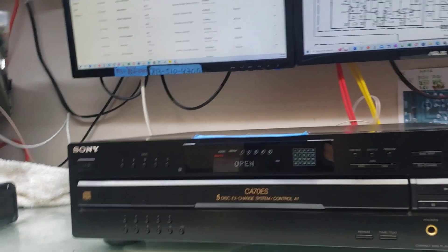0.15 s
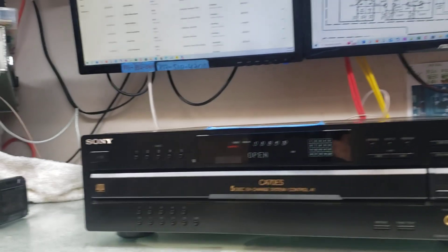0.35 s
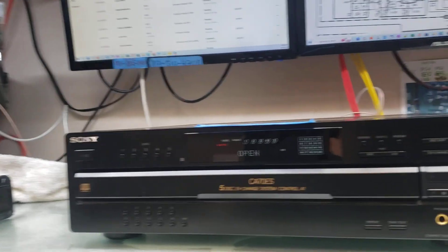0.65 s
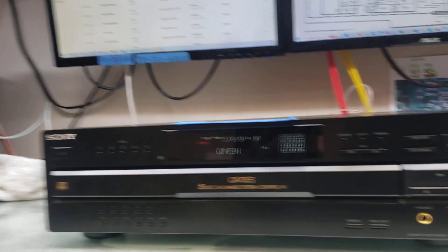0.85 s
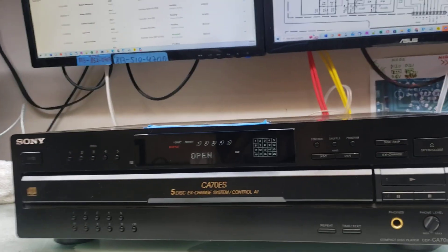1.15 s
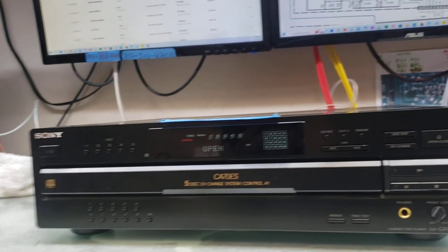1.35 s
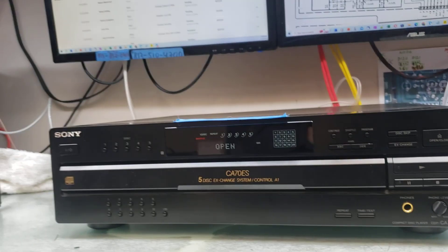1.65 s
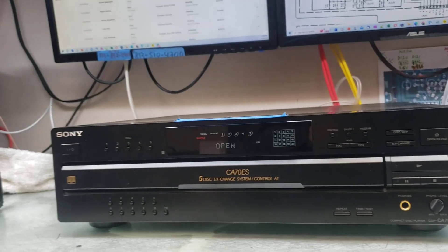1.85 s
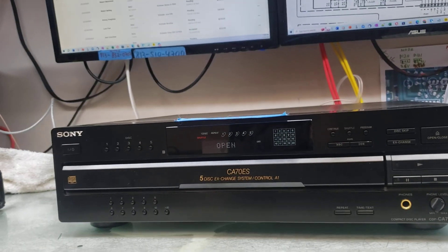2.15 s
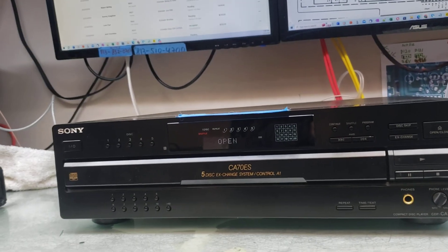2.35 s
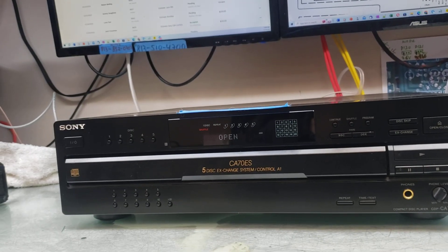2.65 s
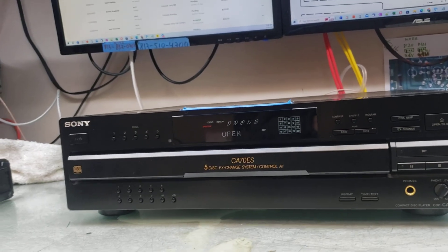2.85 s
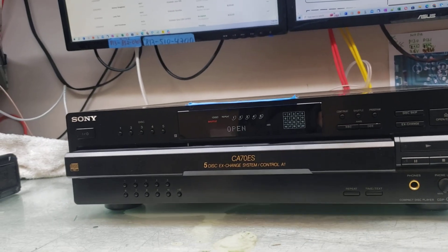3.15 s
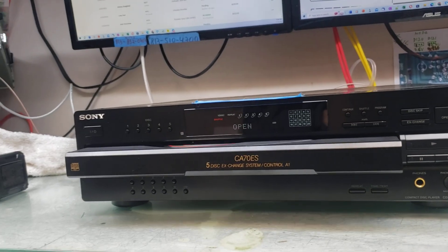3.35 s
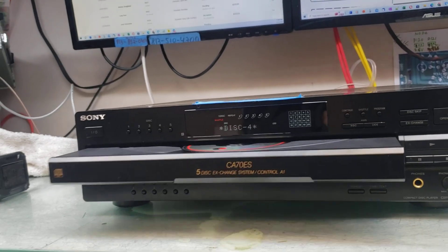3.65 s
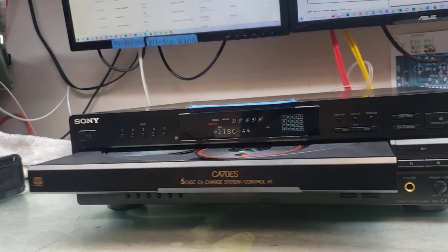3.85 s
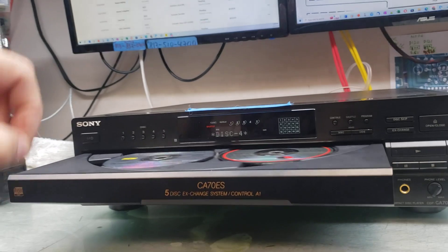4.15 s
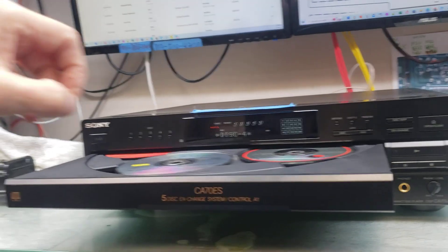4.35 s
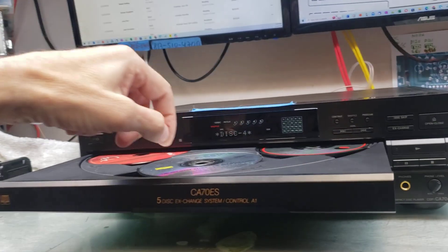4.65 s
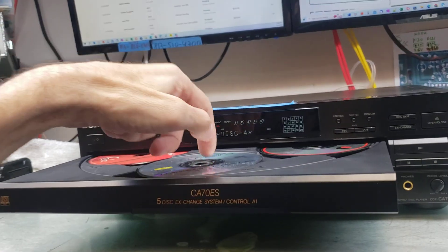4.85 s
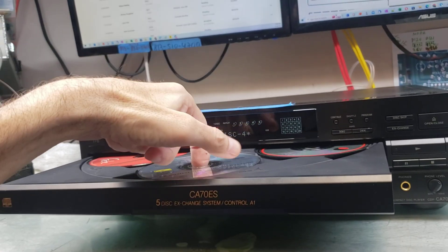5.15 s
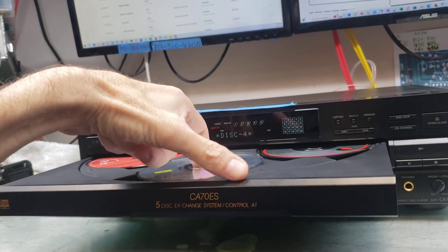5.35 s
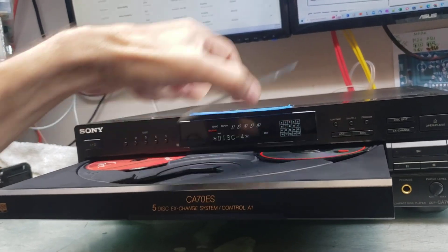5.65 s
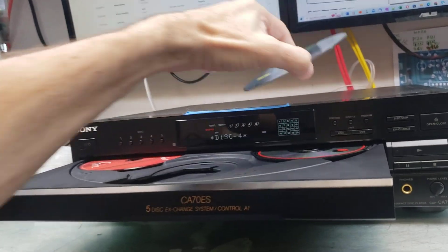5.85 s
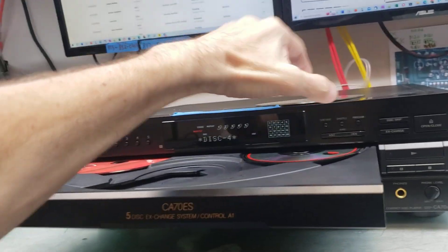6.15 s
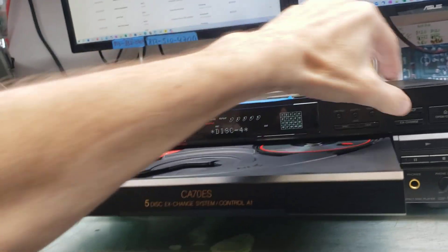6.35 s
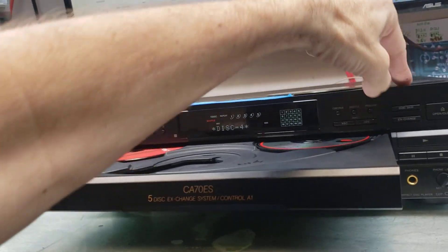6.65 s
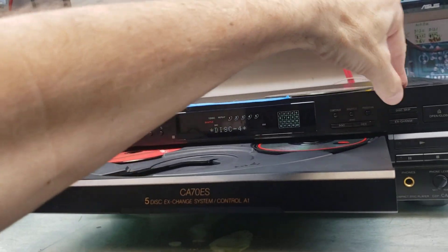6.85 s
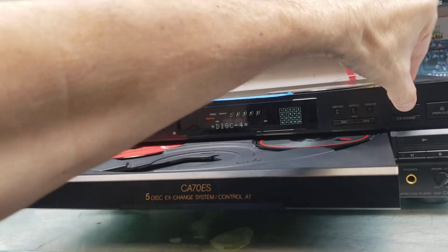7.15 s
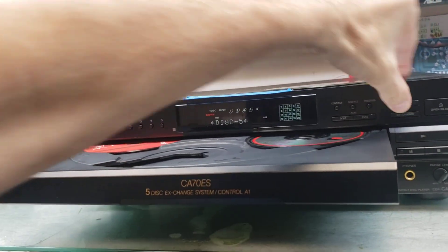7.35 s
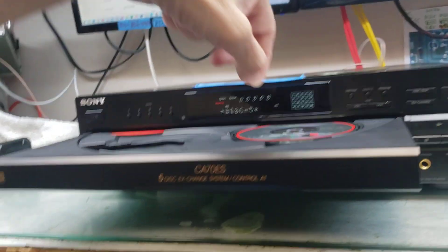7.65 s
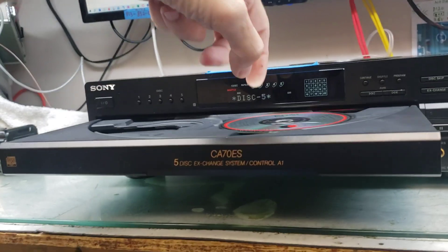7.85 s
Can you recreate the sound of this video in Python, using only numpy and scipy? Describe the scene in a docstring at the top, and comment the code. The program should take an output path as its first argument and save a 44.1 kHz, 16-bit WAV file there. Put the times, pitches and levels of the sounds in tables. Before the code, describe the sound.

A large key on a carousel disc changer thumps and clacks right at the start, close to a hand-held microphone. From about 0.8 seconds the motor grinds with a faint whine, and irregular knocks ring in the steel case, clustering around 1.5 and 2.8 seconds. From about 2.6 seconds the plastic tray slides out with a fine, high hiss; the motor gains a hum, then stops at 4.5 seconds. Light ticks follow at 5 seconds, and a disc is lifted with a sharp scrape and clicks around 5.4 seconds. It is laid on the lid with a short clatter at 6 seconds. A button snaps at 7.2 seconds and the platter turns with a soft whir and hiss until the end at 8 seconds, with a few low bumps through bench and microphone. Workshop fans drone quietly throughout.

```python
"""A key thumps and clacks on a carousel disc changer, close to a hand-held camera with two microphone
ports. The loader knocks and the motor grinds, both exciting the modes of the steel case, and the tray
hisses out by friction on its rails. A hand lifts a disc and lays it on the lid with scrapes and ticks;
a button snaps and the platter turns briefly. Low jolts pass through bench and camera, and fans drone
in the workshop throughout."""
import sys
import numpy as np
from scipy import signal
from scipy.fft import rfft, irfft
from scipy.io import wavfile
from scipy.ndimage import uniform_filter1d

SR = 44100
rng = np.random.default_rng(int(sys.argv[2]) if len(sys.argv) > 2 else 0)


def store_pcm(level_fs):
    """Save levels as 16-bit WAV."""
    pcm = np.round(np.clip(level_fs, -1, 1) * 32767).astype(np.int16)
    wavfile.write(sys.argv[1], SR, np.atleast_2d(pcm).T)


N = 352800

# Modes of the steel case in five groups, from low to high: pitch_hz, width_hz, level_db
CASE_LOW = [(90, 16, -6.5), (199, 21.6, -3), (290.8, 27, 3), (406, 103, -3)]
CASE_HOLLOW = [(499.4, 41, -3.5), (606, 50, -2.5), (772, 170, -4.5)]
CASE_MID = [(840, 48, -2.1), (963, 110, 1.8), (1082, 78, 0.5)]
CASE_UPPER = [(1226, 203, 0.5), (1517, 130, -1.5), (1655, 112, -1.5), (1950, 174, -3), (2086, 320, -4.5)]
CASE_HIGH = [(2570, 460, 12.5), (3450, 720, -24), (3870, 1800, 8), (6050, 340, 8), (6660, 890, 8)]


def motor():
    """Forced vibration: uneven gear teeth shake the case; commutator, belt and platter gear add tones."""
    # Loader, tray and platter runs, a table each: time_s, grind_db, whine_db
    run_levels = [
        [(0.78, -79, -88), (0.85, -54.5, -70), (0.99, -60, -65), (1.25, -69.5, -65.5), (1.53, -66, -72),
         (1.68, -56.5, -68), (1.9, -63.5, -68), (2.06, -66, -68.5), (2.16, -58.5, -69), (2.35, -74, -72.5),
         (2.55, -62, -69), (2.8, -55, -66), (3.02, -50.5, -74), (3.31, -62, -62.5), (3.36, -65, -56)],
        [(3.38, -58.5, -61), (3.42, -55, -60.5), (3.71, -53.5, -61), (4.1, -53, -69), (4.35, -55, -59),
         (4.49, -53.5, -66), (4.54, -62.5, -86)],
        [(7.3, -63, -90), (7.37, -62.5, -90), (7.56, -71, -95), (8.0, -73.5, -94)],
    ]
    # What each run adds: low_modes_above_grind_db, hum_above_grind_db, platter_whine_db
    run_tones = [(1.5, -13, -82), (-5, -4.5, -80), (6, 1.5, -77.5)]
    # Drone of the loaded motor: time_s, pitch_hz
    hum_curve = [(3.35, 403.8), (3.614, 411.7), (4.5, 411.7)]
    # A dry gear rubbing: start_s, length_s, level_db
    rasps = [(0.84, 0.066, -73), (3.665, 0.082, -64.5), (3.776, 0.12, -68.5), (3.95, 0.5, -73)]
    teeth_per_s, whine_hz, platter_hz = 1500, 1490, 1930
    flutter_db, flutter_per_s, fade_s = 3, 14, 0.02
    tooth_size = gain_of(2.8 * np.minimum(rng.exponential(1, N), 5))
    impacts = tooth_size * (rng.random(N) < teeth_per_s / SR)
    lumps = gain_of(1.3 * drift(25))
    teeth = unit_rms(port_noise() * (2 + unit_rms(uniform_filter1d(impacts, 30)))) * lumps
    shell = gain_of(-8) * ring(teeth, CASE_HOLLOW) + gain_of(-4) * ring(teeth, CASE_MID)
    shell += gain_of(-2.5) * ring(teeth, CASE_UPPER)
    runs = [[(*row, *tones) for row in run] for run, tones in zip(run_levels, run_tones)]
    low_flutter, whine_flutter, platter_flutter, hum_flutter = (
        gain_of(flutter_db * drift(flutter_per_s)) for _ in range(4))
    grind = envelope(runs, [1], fade_s) * shell
    grind += low_flutter * envelope(runs, [1, 3], fade_s) * ring(teeth, CASE_LOW[1:3])
    rasp = contacts(rasps, [2], t60_s=0.25, rise_s=0.006, held=True) * ring(teeth, CASE_HIGH)
    whine = np.sqrt(whine_flutter) * envelope(runs, [2], fade_s) * waver(whine_hz, 110, 0.21, 0.3)
    whine += platter_flutter * envelope(runs, [5], 0.004) * waver(platter_hz, 90, 0.38, 0.24)
    hum_hz = np.interp(np.arange(N) / SR, *np.transpose(hum_curve))
    hum = hum_flutter * envelope(runs, [1, 4], fade_s) * waver(hum_hz, 59, 0.75, 0.73)
    return grind + rasp + whine + hum


def loader_knocks():
    """Impact excitation: where a knock lands sets how strongly each group of case modes rings."""
    # Knocks: start_s, mid_db, then relative to mid_db: low_db, hollow_db, upper_db, high_db
    knocks = [(0.494, -72, 24, 4, -9, -12), (0.808, -48, -15, -15, -7, -28), (0.821, -45, -16, -7, -8, -29),
              (1.012, -44, -3, 4, -21, -29), (1.124, -57.5, 7.5, 9, -2, -20),
              (1.492, -41.5, -8, -16, -13, -21), (1.508, -42, -9, 0.5, 0.5, -13),
              (1.591, -48.5, -7, 1, -18, -23), (1.666, -48, -14, -2.5, -14, -18),
              (1.691, -45.5, -7, -4, -5, -11), (1.711, -48.5, -9, 1, -10, -10.5),
              (1.773, -47.5, -20, -1.5, -6, -15.5), (2.089, -62, 0, 10.5, 4, -12),
              (2.154, -48, -7, 2, -4, -22), (2.496, -54.5, 5.5, 5.5, -5, -29),
              (2.546, -39, -23, -20, -11, -28), (2.754, -62.5, -2, 12, 11, -3),
              (2.791, -38, -4, -8, -5.5, -15.5), (2.807, -49, -20, -22, -18, -16),
              (2.857, -55.5, 9, 0, 6, -6), (2.889, -39.5, 0.5, -3.5, -3.5, -22),
              (2.948, -44.5, 0, -11, -14, -23), (2.965, -50, 1, 3, 6, -21), (3.006, -47.5, 6, -3, 4.5, -7),
              (3.081, -63.5, 0, 12, 6, -9), (3.665, -61, -4, -19, 10, 1), (3.801, -56, 2, -6, -5, -12),
              (3.88, -61, 14, 10, -4, 4), (4.107, -52, 10, -4, 3.5, -7), (4.475, -53.5, 11, 2, 4, 2.5),
              (7.811, -66, 5, 6, 8, 4)]
    t60_s, touch_gain = 0.085, 8
    rough = port_noise()

    def force(columns, rise_s):
        """Contact force: an impulse at first touch, then decaying noise."""
        touch = np.zeros(N)
        for row in knocks:
            touch[round(row[0] * SR)] = touch_gain * gain_of(sum(row[c] for c in columns))
        return rough * contacts(knocks, columns, t60_s, rise_s) + touch

    out = ring(force([1], 0.0013), CASE_MID)
    out += ring(force([1, 2], 0.0045), CASE_LOW)
    out += ring(force([1, 3], 0.0041), CASE_HOLLOW)
    out += ring(force([1, 4], 0.0013), CASE_UPPER)
    return out + ring(rough * contacts(knocks, [1, 5], t60_s, 0.0044), CASE_HIGH)


def rail_friction():
    """Sliding friction: plastic on rails makes a fine hiss, a wandering whistle and a high sizzle."""
    # Tray and platter slides, a table each: time_s, hiss_db, whistle_db, sizzle_db
    slides = [
        [(2.62, -84, -90, -89), (2.82, -65.5, -74, -74), (3.12, -70.5, -68, -73), (3.3, -68.5, -62, -70),
         (3.8, -62, -67, -67), (4.3, -62.5, -61, -65), (4.52, -65, -61, -64), (4.67, -75, -76, -70),
         (4.79, -87, -87, -83)],
        [(7.36, -70, -76, -72), (7.5, -67.5, -72, -66), (8.0, -67.5, -71, -68)],
    ]
    # Friction spectra of hiss and sizzle: frequency_hz, density_db
    hiss_spectrum = [(2500, -58), (5500, -5.5), (6500, -7), (8500, 0.5), (9800, 0), (11200, 1),
                     (12000, -1.5), (13000, -3), (14500, -17)]
    sizzle_spectrum = [(11500, -25), (13000, -14), (14000, -1), (16000, -1)]
    whistle_hz = 10150 + 110 * drift(12)
    whistle = gain_of(-8 + 3 * drift(20)) * waver(whistle_hz, 800, 0, 0.1)
    hiss = envelope(slides, [1], 0.085) * port_noise(hiss_spectrum) * gain_of(1.1 * drift(60))
    sizzle = envelope(slides, [3], 0.05) * port_noise(sizzle_spectrum)
    sizzle *= gain_of(0.8 * drift(60) + 1.2 * drift(12))
    return hiss + sizzle + envelope(slides, [2], 0.05) * whistle


def disc_handling():
    """Friction and edge impacts excite the modes of the disc; scrapes also ring the tray or lid below."""
    # Hand or disc dragged over plastic: start_s, length_s, scratch_db, disc_db, hollow_db, rim_db, fizz_db
    scrapes = [(0.005, 0.065, -65, -60.5, -72, -88, -59.5), (0.065, 0.021, -56, -45, -44.5, -58, -63),
               (4.966, 0.0086, -59, -50.5, -52.5, -69, -64), (5.035, 0.13, -81, -60.5, -59.5, -69.5, -79),
               (5.23, 0.05, -76, -68, -85, -91, -80), (5.375, 0.006, -68, -43, -64, -85, -75),
               (5.424, 0.031, -33.5, -35, -49.5, -42, -34.5), (5.517, 0.036, -68, -55, -69, -53.5, -69),
               (6.006, 0.072, -53, -44, -41.5, -49.5, -56), (6.141, 0.017, -54.5, -46, -41.5, -62, -56)]
    # Ticks of disc edge and button: start_s, level_db, ring_offset_db, left_minus_right_db, crack_db
    ticks = [(4.971, -43.5, -19, 5, -47), (5.0619, -56, -6, 4.5, -72), (5.093, -55, -8, 8, -73),
             (5.127, -47.5, -3, 6.0, -69), (5.379, -61.5, 20.5, -1, -67), (5.4211, -29.5, 4, -1, -46),
             (5.442, -28.5, -14, -3, -43), (5.4758, -32, 5.5, -8, -46), (5.544, -42.5, -12, 2, -62),
             (6.01, -30.5, -0.5, -6, -52), (6.0483, -33, -6, -12, -50), (6.069, -44, -8, -3, -54),
             (6.1322, -38, -6, 2, -55), (6.147, -33, -8.5, 0, -52), (7.221, -30, -3.5, -1, -36),
             (7.339, -62, 11, -4, -39)]
    # Contact noise spectra: frequency_hz, density_db
    scratch_spectrum = [(1200, -33), (2200, 5), (3000, 3.5), (4300, 4), (5300, 2), (6200, 4), (7500, 3),
                        (10000, -9.5), (13000, -11), (16000, -11)]
    crack_spectrum = [(4000, -28), (9000, 3), (12000, 4), (16000, -2)]
    # Modes of the disc and the rim: pitch_hz, width_hz, level_db
    disc_modes = [(477, 91, -1), (665, 47, 0), (753, 110, 2.5), (980, 163, 8), (1248, 180, 5),
                  (1590, 330, 5), (2080, 630, 0.5)]
    rim_modes = [(2715, 50, -2.5), (4370, 150, 2)]
    grip_s, tick_t60_s = 0.0054, 0.087

    def drag(column, t60_s):
        """Friction envelope of one part: grip, drag, free decay."""
        return contacts(scrapes, [column], t60_s, grip_s, held=True)

    grain = gain_of(0.39 * drift(300))
    scratch, rough, bright = port_noise(scratch_spectrum), port_noise(), port_noise(crack_spectrum)
    out = drag(2, 0.14) * grain * scratch
    out += ring(drag(3, 0.21) * grain * rough, disc_modes)
    out += drag(4, 0.44) * ring(rough, CASE_LOW[1:])
    out += drag(5, 0.13) * gain_of(-0.5) * ring(rough, rim_modes)
    out += drag(6, 0.13) * grain * gain_of(-4.5) * bright
    crack = np.exp(-np.arange(400) / (0.0014 * SR))  # an edge's first touch is short and bright
    for start_s, level_db, _, lean_db, crack_db in ticks:
        pan = gain_of([[lean_db / 2], [-lean_db / 2]])
        out += pan * gain_of(-9.5) * contacts([(start_s, level_db)], [1], tick_t60_s, 0.00034) * scratch
        span = slice(round(start_s * SR), round(start_s * SR) + len(crack))
        out[:, span] += pan * gain_of(crack_db) * crack * bright[:, span]
    return out + gain_of(-3.5) * ring(contacts(ticks, [1, 2], tick_t60_s, 0.0009) * rough, disc_modes)


def panel_key():
    """Modal response to a large key: the front panel thumps while the key's edge clacks."""
    # Press and release: start_s, level_db, edge_offset_db
    strokes = [(0.069, -29.5, -8), (0.19, -34, -8), (0.294, -53, -11), (0.338, -57, -7.5)]
    # Modes of the panel and the key's edge: pitch_hz, width_hz, level_db
    panel_modes = [(271, 300, 2.5), (530, 130, 0), (650, 89, -12), (1010, 400, -4.5)]
    edge_modes = [(1410, 540, 1.5), (2110, 310, 2.5), (2310, 140, -0.5), (3400, 400, -26),
                  (4300, 360, -12.5)]
    t60_s = 0.15
    rough = port_noise()
    thump = ring(rough * contacts(strokes, [1], t60_s, 0.002), panel_modes)
    clack = ring(rough * contacts(strokes, [1, 2], t60_s, 0.0065), edge_modes)
    return thump + clack


def button():
    """Damped vibration: the cap rings briefly when its switch snaps."""
    # The snap and its cap: start_s, level_db, modes (pitch_hz, width_hz, level_db)
    snap = (7.221, -28, [(580, 450, -5.5), (980, 340, -6), (1330, 150, 0), (1710, 230, 2), (1950, 140, 0.5),
            (4600, 280, -7.5), (7740, 310, -6)])
    start_s, level_db, cap_modes = snap
    force = contacts([(start_s, level_db)], [1], t60_s=0.04, rise_s=0.00035) * port_noise()
    return ring(force, cap_modes)


def bench_jolts():
    """Structure-borne sound: bench and camera sway, boom and thud on a few low modes."""
    # Jolts: peak_time_s, sway_db, boom_db, thud_db
    jolts = [(0.086, -42, -41, -36.5), (0.2, -60, -64, -56), (1.03, -64, -61, -55), (1.076, -56, -63, -59),
             (1.156, -57, -64, -58), (1.52, -78, -62, -59), (1.745, -61, -65, -60), (2.11, -62, -57, -58),
             (2.936, -65, -45, -47.5), (3.014, -60, -46, -49.5), (3.09, -64, -51, -62),
             (3.15, -59, -60, -69), (3.84, -55, -65, -59), (5.488, -53, -52, -48.5), (5.556, -58, -65, -62),
             (6.05, -72, -60, -56), (6.11, -57, -64, -63), (7.75, -52, -61, -50.5), (7.8, -50, -58, -50.5),
             (7.86, -58, -59, -67), (7.928, -52, -70, -77)]
    sway_hz, boom_hz, thud_hz = 61.5, 91.7, (141, 211.8)
    rise_s, sway_t60_s, thud_t60_s = 0.035, 0.3, 0.2
    thud = unit_rms(sum(waver(hz, 40.5, 0.49, 0.91) for hz in thud_hz))
    onsets = np.array(jolts) - [rise_s, 0, 0, 0]
    # The drifting floor is a tremor: the bench never quite rests.
    sway_gain = contacts(onsets, [1], sway_t60_s, rise_s) + gain_of(-72.5 + 3.2 * drift(7))
    thud_gain = contacts(onsets, [3], thud_t60_s, rise_s) + gain_of(-69.5 + 4.5 * drift(9))
    boom = contacts(onsets, [2], thud_t60_s, rise_s) * waver(boom_hz, 22.4, 0.66, 0.9)
    return sway_gain * waver(sway_hz, 25, 0.93, 0.88) + boom + thud_gain * thud


def reflections(x, t60_s=0.25):
    """Reverberation: sparse, dulled echoes of random sign decay exponentially at each port."""
    grid = np.arange(300, SR // 2, 20)
    taps = np.zeros((2, SR // 2 + 20))
    delays = grid + rng.integers(0, 20, (2, len(grid)))
    echoes = rng.choice([-1., 1.], delays.shape) * gain_of(-60 * grid / SR / t60_s)
    np.put_along_axis(taps, delays, echoes, 1)
    taps = signal.lfilter([1], [1, -0.5], taps)
    taps[1] += signal.lfilter(*signal.butter(2, 800, fs=SR), taps[0] - taps[1])  # the ports share the bass
    return signal.oaconvolve(x, taps / np.linalg.norm(taps[0]), axes=1)[:, :N]


def room_fans():
    """A diffuse field: broad drone and fuzzy fan tones, with a steady hiss that leans left."""
    # Spectrum of the drone: frequency_hz, density_db
    drone_spectrum = [(15, -48), (25, -55), (44, -12), (108, -11), (168, -9), (193, -15), (278, -3),
                      (417, -10), (636, -14), (883, -22), (954, -16.5), (1090, -25), (2500, -40),
                      (3250, -57), (5500, -120)]
    # Fan tones: pitch_hz, width_hz, level_db
    fans = [(126, 8.8, -90), (290, 35, -66.5), (617, 23, -75), (937, 4.3, -71), (1866, 230, -77.5)]
    # Hiss of fans and microphone: frequency_hz, density_db
    hiss_spectrum = [(1500, -40), (2400, -6), (3000, -4), (3700, -8.5), (4200, -3), (4800, -10.5),
                     (5400, -7), (6000, -1), (6600, 5), (7300, -5), (9500, -5), (12500, -3), (14300, -12.5),
                     (14800, 0), (16000, -5)]
    # Direction of the hiss: frequency_hz, left_minus_right_db
    hiss_lean = [(5000, 0.6), (7500, 0.7), (9500, 6), (11500, 5), (13500, 0.5), (16000, -1.5)]
    # Likeness of room sound at the two ports: frequency_hz, coherence
    diffuse = [(30, 0.84), (125, 0.87), (300, 0.84), (600, 0.51), (1100, 0.11), (3000, .03)]
    drone_db, hiss_db = -57.2, -70.5
    tones = sum(gain_of(db) * ring(port_noise(coherence=diffuse), [(hz, width_hz, 0)])
                for hz, width_hz, db in fans)
    pan = gain_of(curve_at(hiss_lean, np.fft.rfftfreq(N, 1 / SR)) * np.array([[0.5], [-0.5]]))
    hiss = gain_of(hiss_db) * irfft(rfft(port_noise(hiss_spectrum, diffuse)) * pan, N)
    drone = gain_of(drone_db + 0.35 * drift(4.06)) * port_noise(drone_spectrum, diffuse)
    return drone + hiss + tones


def port_noise(spectrum=((20, 0), (20000, 0)), coherence=None):
    """Spatial coherence: noise at two ports is alike in the bass and apart in the treble."""
    # Likeness of near sources at the two ports: frequency_hz, coherence
    near = [(30, 0.9), (125, 1), (300, 0.97), (600, 0.82), (1100, 0.54), (2000, 0.12), (3000, 0.045),
            (15000, 0.027)]
    # Phase between the ports: frequency_hz, left_lead_rad
    lead = [(20, .6), (125, 0.11), (300, 0.18), (550, -0.099), (1100, 0.02), (2000, 0.77), (16000, 0.57)]
    hz = np.fft.rfftfreq(N, 1 / SR)
    a, b, c, d = rng.standard_normal((len(hz), 4)).T
    left, independent = a + 1j * b, c + 1j * d
    alike = np.clip(curve_at(coherence or near, hz), -1, 1)
    right = alike * left * np.exp(-1j * curve_at(lead, hz)) + np.sqrt(1 - alike ** 2) * independent
    return unit_rms(irfft(np.array([left, right]) * gain_of(curve_at(spectrum, hz)), N))


def ring(x, modes):
    """Modal superposition: two-pole resonators of alternating sign, low-passed above the top mode."""
    out = 0
    for k, (hz, width_hz, db) in enumerate(modes):
        mode = signal.lfilter(*signal.iirpeak(hz, hz / width_hz, SR), x)
        out += (-1) ** k * gain_of(db) * mode * np.sqrt(SR / (np.pi * width_hz))
    lowpass = signal.butter(2, min(1.59 * modes[-1][0], 0.4 * SR), fs=SR)
    return signal.lfilter(*lowpass, out) / np.linalg.norm(gain_of(np.array(modes)[:, 2]))


def waver(hz, width_hz, steadiness, coherence):
    """Random modulation of a tone; steadiness (0-1) evens its level, coherence (0-1) ties the ports."""
    pole = np.exp(-np.pi * width_hz / SR)
    noise = rng.standard_normal((2, N)) + 1j * rng.standard_normal((2, N))
    slow = signal.lfilter([1 - pole], [1, -pole], signal.lfilter([1], [1, -pole], noise))
    slow[1] = coherence * slow[0] + np.sqrt(1 - coherence ** 2) * slow[1]
    slow /= (abs(slow) + 1e-12) ** steadiness
    carrier = np.exp(2j * np.pi * np.cumsum(hz * np.ones(N)) / SR)
    return unit_rms((slow * carrier).real)


def contacts(rows, columns, t60_s, rise_s, held=False):
    """Exponential decay after each rise to the summed dB columns; if held, column 1 is the hold_s."""
    t, out = np.arange(SR) / SR, np.zeros(N + SR)
    for row in rows:
        decay_s = np.maximum(t - rise_s - (row[1] if held else 0), 0)
        level_db = sum(row[c] for c in columns) - 60 * decay_s / t60_s
        out[max(round(row[0] * SR), 0):][:SR] += np.minimum(t / rise_s, 1) * gain_of(level_db)
    return out[:N]


def envelope(tables, columns, fade_s):
    """Amplitude envelope from summed dB columns, fading to silence outside each table."""
    t, out = np.arange(N) / SR, np.zeros(N)
    for rows in map(np.array, tables):
        time_s = rows[:, 0]
        gate = np.clip(np.minimum(t - time_s[0], time_s[-1] - t) / fade_s + 1, 0, 1)
        out += gate * gain_of(np.interp(t, time_s, rows[:, columns].sum(1)))
    return out


def drift(per_s):
    """Random fluctuation of rms 1, linear between per_s values a second."""
    steps = rng.standard_normal(int(N / SR * per_s) + 2)
    return unit_rms(np.interp(np.arange(N) / SR * per_s, np.arange(len(steps)), steps))


def curve_at(points, hz):
    """Interpolation on a logarithmic frequency axis."""
    point_hz, values = np.transpose(points)
    return np.interp(np.log(hz + 1), np.log(point_hz + 1), values)


def gain_of(db):
    """Decibels to amplitude ratio."""
    return 10 ** (np.asarray(db) / 20)


def unit_rms(x):
    """Normalisation to rms 1."""
    return x / np.sqrt(np.mean(x ** 2) + 1e-20)


def scene():
    """Superposition: the impacts and their reverberation over motor, rails, bench and fans."""
    hits = loader_knocks() + panel_key() + disc_handling() + button()
    echo = gain_of(-12) * reflections(hits)
    return hits + echo + motor() + rail_friction() + bench_jolts() + room_fans()


def record(dry):
    """Frequency response: each port colours the treble in its own way, then a low-pass limits the band."""
    # Imbalance of the ports: frequency_hz, left_minus_right_db
    imbalance = [(60, 0.0), (180, 1), (550, 2), (1200, 0.6), (2000, -0.8), (2700, 9), (3400, 0), (4700, 1),
                 (5400, 7.5), (6500, 21), (7500, 15), (8300, 5), (9000, 7.5), (10000, 2.2), (13500, 0),
                 (14800, 6), (16000, 11)]
    # Response common to both ports: frequency_hz, gain_db
    response = [(20, -1.5), (7000, -1), (7700, -6.5), (8300, -12.5), (8900, -5), (9400, 1), (20000, 10)]
    cutoff_hz = 15880
    hz = np.fft.rfftfreq(N, 1 / SR)
    lean = gain_of(curve_at(imbalance, hz))
    sides = np.array([lean, np.ones_like(lean)]) * np.sqrt(2 / (1 + lean ** 2))  # constant total power
    coloured = irfft(rfft(dry) * sides * gain_of(curve_at(response, hz)), N)
    lowpass = signal.firwin(1023, cutoff_hz, window=("kaiser", 9), fs=SR)
    return signal.oaconvolve(coloured, lowpass[None], "same")


dry = scene()
out = record(dry)
store_pcm(out)
```